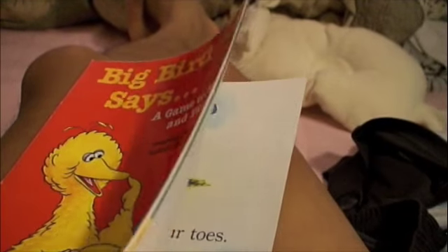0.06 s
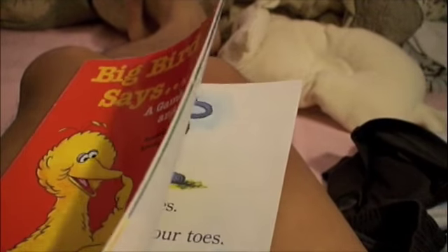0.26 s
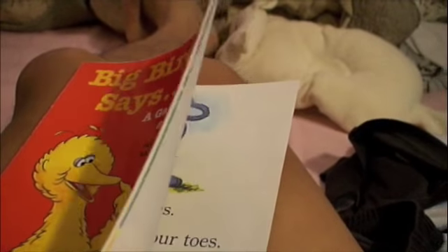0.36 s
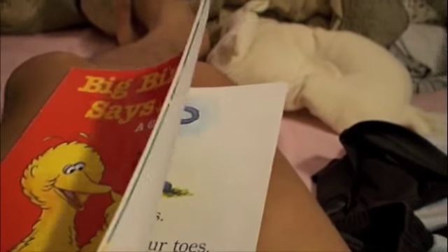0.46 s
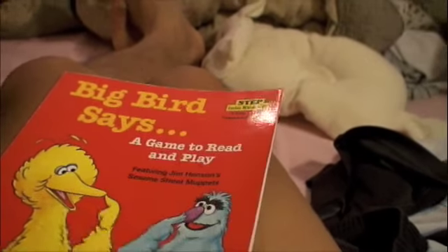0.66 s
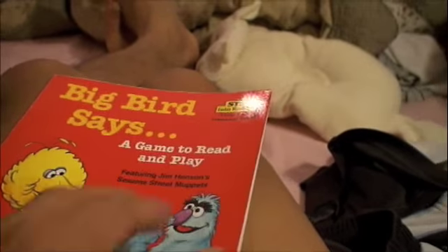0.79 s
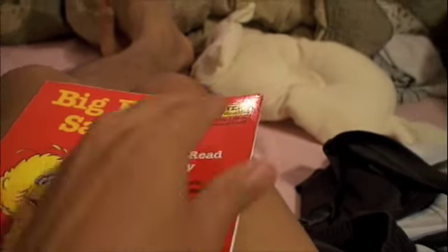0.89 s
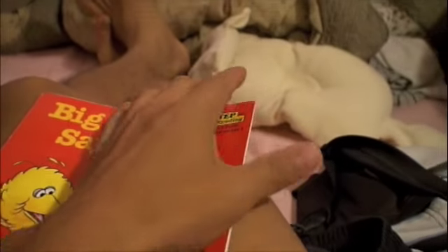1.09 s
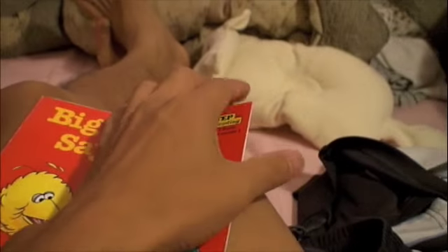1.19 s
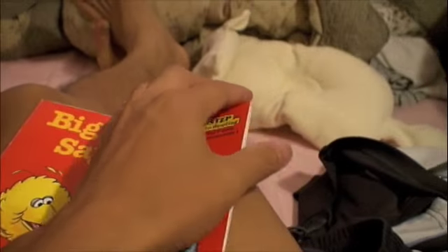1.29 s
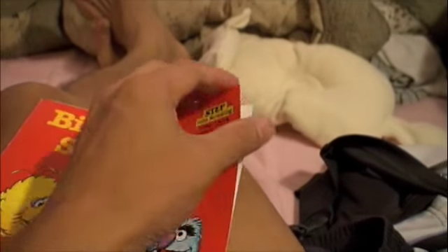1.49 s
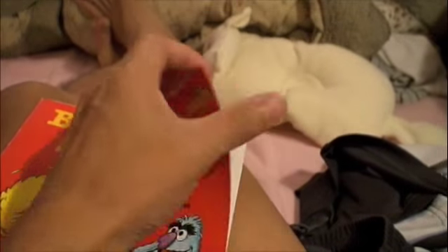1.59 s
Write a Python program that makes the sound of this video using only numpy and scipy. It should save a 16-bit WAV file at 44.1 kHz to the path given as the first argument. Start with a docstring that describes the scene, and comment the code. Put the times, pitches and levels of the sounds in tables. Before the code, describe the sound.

A thin book flicks and slaps shut close by in a quiet room.

```python
"""A thin, stiff picture book is closed near the microphone, over the low hum of a quiet bedroom.
The bent cover slides off the thumb and springs free with a sharp flick (0.22 s).
It swishes down and slaps shut, ringing the book (0.58 s); the pages settle in two dull pats.
A hand then brushes the cover and takes hold of its edge (1.3-1.5 s). The small room echoes briefly."""
import sys
import numpy as np
from scipy import signal
from scipy.fft import rfft, irfft, next_fast_len
from scipy.io import wavfile

SR = 44100
rng = np.random.default_rng(int(sys.argv[2]) if len(sys.argv) > 2 else 0)


def pcm_store(signal):
    """Save signal as 16-bit PCM."""
    levels = np.round(np.clip(np.atleast_2d(signal), -1, 1) * 32767)
    wavfile.write(sys.argv[1], SR, levels.astype(np.int16).T)


N = 72765

# room air spectrum, each side (frequency [Hz], gain [dB])
AIR_LEFT_EQ = [(25, -13), (85, 20.5), (200, 10.5), (400, 9), (1000, 3), (2000, -3.5), (5000, -13.5),
               (11000, -16.5), (16000, -45)]
AIR_RIGHT_EQ = [(25, 4.5), (85, 9.5), (200, 2), (400, 0), (1000, -3), (2000, -8), (5000, -11), (11000, -12),
                (16000, -13)]
# room hum (frequency [Hz], level [dB])
HUM_TONES = [(84, -63.5), (120, -64), (240, -67)]
# wall echo spectrum (frequency [Hz], gain [dB])
WALL_EQ = [(60, -6), (280, -2.5), (600, -7.5), (1200, -1), (1850, -0.5), (2500, 3), (3400, -2), (7000, 1),
           (9000, 4), (15000, 6.5)]
# left channel: thin bass, treble rolling off above 11 kHz (frequency [Hz], gain [dB])
LEFT_CHANNEL_EQ = [(30, -11), (80, -25.5), (200, -11.5), (500, -5.5), (1000, -1.5), (2500, -0.5),
                   (6000, 2.5), (10000, 3), (11200, 1), (11800, -2), (16000, -11)]

# skin on the glossy cover (peak time [s], level [dB], rise [s], fall [s])
BRUSH_STROKES = [(.345, -46, 0.032, 0.022), (.5775, -33.5, 0.0066, 0.0092), (.89, -59, 0.059, 0.038),
                 (1.265, -60, 0.018, 0.02), (1.35, -52, 0.023, 0.041), (1.43, -59, 0.036, 0.058),
                 (1.497, -44.5, .012, 0.014), (1.648, -56.5, 0.03, .03)]
# skin friction spectrum (frequency [Hz], gain [dB])
BRUSH_EQ = [(60, -11), (300, -2), (480, -2.5), (660, 8), (1500, 2), (2600, 0.5), (4000, -3.5), (8000, -4.5),
            (12000, 1), (16000, -12.5)]
# fingers landing (time [s], level [dB], tilt [dB/octave])
FINGER_TAPS = [(1.26, -49.5, -9), (1.4955, -40, -1.5)]
# cover under a finger (frequency [Hz], level [dB], t60 [s])
TAP_MODES = [(665, 3, 0.036), (710, -4, 0.021), (1106, -3.5, 0.088), (3800, -15, 0.011)]

# paper on paper or thumb (peak time [s], level [dB], rise [s], fall [s])
SLIDE_STROKES = [(0.0, -46, .02, 0.031), (.13, -44.5, 0.16, 0.14), (.21, -46.5, 0.11, 0.083),
                 (.578, -30, 0.004, 0.0051), (.595, -39.5, 0.0041, 0.037), (1.32, -55, 0.045, .035)]
# paper friction spectrum (frequency [Hz], gain [dB])
SLIDE_EQ = [(60, -3), (300, -6.5), (900, -5), (1900, -2), (3200, -8.5), (7000, -16), (11000, -17),
            (16000, -18.5)]
# cover swinging down (peak time [s], level [dB], rise [s], fall [s])
SWING_STROKES = [(.568, -47, 0.11, 0.0088)]
# swish spectrum (frequency [Hz], gain [dB])
SWING_EQ = [(100, -16), (700, -13.5), (2000, 2.5), (3200, -2), (5500, -5.5), (8000, -13), (16000, -14.5)]

# pages landing (time [s], ring [dB], click [dB], thump [dB], tilt [dB/octave], pan left [dB])
PAGE_DROPS = [(.6034, -21, -8, -27, 0, -1), (.6138, -22, -34, -26, -2, -5)]
# page stack (frequency [Hz], level [dB], t60 [s])
STACK_MODES = [(296, -13, 0.035), (425, -3.5, 0.035), (543, -4, 0.039), (716, -6, 0.053),
               (1270, -6.5, 0.022), (1750, -12, .01), (2610, -5.5, 0.01)]
# card-on-paper click spectrum (frequency [Hz], gain [dB])
CLICK_EQ = [(60, -23), (300, -2.5), (800, -7), (2300, -2), (3200, -6), (5000, -7.5), (6800, -8.5),
            (8800, -5.5), (15000, -24)]
# closed book (frequency [Hz], level [dB], t60 [s])
CLOSED_BOOK_MODES = [(440, -17, 0.013), (613, -14.5, 0.025), (810, -31.5, 0.014), (1140, -20.5, 0.0075),
                     (1615, -16, 0.0093), (2150, -17, 0.014), (2365, -12.5, 0.011), (4560, -18.5, 0.0054),
                     (5560, -15.5, 0.0032), (8750, -21, 0.0037)]
# flick crack spectrum (frequency [Hz], gain [dB])
CRACK_EQ = [(60, -37), (400, -16.5), (1000, 2), (2000, -2.5), (3200, -1.5), (4000, 4), (5800, -6.5),
            (7000, -6.5), (8100, -14.5), (10000, -7), (15000, -20)]
# bent cover (frequency [Hz], level [dB], t60 [s])
BENT_COVER_MODES = [(206, -35, 0.07), (586, -15, 0.02), (914, -6, 0.0082), (1040, -32, 0.0047),
                    (1743, 3.5, 0.01), (2103, 0, 0.0098), (2680, -12, 0.017), (2700, -39, 0.021),
                    (4030, -42, 0.0069), (4400, -43, 0.0064), (6370, -10.5, 0.0042), (10700, -44, 0.0051)]


def undb(db):
    """Decibels to gain."""
    return 10 ** (np.asarray(db) / 20)


def pan(left_db):
    """Stereo gains for a left-minus-right level."""
    return undb(np.array([[left_db], [-left_db]]) / 2)


def colour(x, eq):
    """Minimum-phase filter through (frequency [Hz], gain [dB]) points."""
    size = 2 * next_fast_len(N)
    hz, db = np.array(eq, float).T
    bins_hz = np.maximum(np.fft.rfftfreq(size, 1 / SR), 1)
    gain = undb(np.interp(np.log(bins_hz), np.log(np.sort(hz)), db))
    cepstrum = irfft(np.log(gain))
    cepstrum[1:size // 2] *= 2
    cepstrum[size // 2 + 1:] = 0
    return irfft(rfft(x, size) * np.exp(rfft(cepstrum)), size)[..., :N]


def since(start_s):
    """Seconds since the start, zero before it."""
    return np.maximum(np.arange(N) / SR - start_s, 0)


def fade(age_s, t60_s):
    """Exponential decay."""
    return np.exp(-np.log(1000) * age_s / t60_s)


def impulse(start_s, db):
    """One-sample push."""
    return undb(db) * (np.arange(N) == int(start_s * SR))


def burst(start_s, t60_s):
    """Decaying stereo noise."""
    age_s = since(start_s)
    return rng.standard_normal((2, N)) * (age_s > 0) * fade(age_s, t60_s)


def echo(x, delay_s, t60_s):
    """Diffuse stereo reflections of unit energy."""
    response = burst(delay_s, t60_s)
    response /= np.sqrt(np.sum(response ** 2, axis=1, keepdims=True))
    return signal.fftconvolve(x[None], response, axes=1)[:, :N]


def ring(start_s, modes, rise_cycles, lag_cycles, tilt_db_oct=0):
    """Modes of a card sheet; bending waves bring the high ones first."""
    out = np.zeros(N)
    for hz, db, t60_s in modes:
        age_s = since(start_s + lag_cycles / hz)
        gain = undb(db + tilt_db_oct * np.log2(hz / modes[1][0]))
        attack = 1 - np.exp(-age_s * hz / rise_cycles)
        out += gain * attack * fade(age_s, t60_s) * np.sin(2 * np.pi * hz * age_s)
    return out


def rub(strokes, eq, grain_db=1.5, grain_s=0.0011, spread=0.74):
    """Grainy friction noise, swelling and dying with each stroke."""
    t = since(0)
    power = sum(undb(2 * db) * np.exp(-2 * np.maximum((peak_s - t) / rise_s, (t - peak_s) / fall_s))
                for peak_s, db, rise_s, fall_s in strokes)
    noise = rng.standard_normal((4, N))
    sides, centre, roughness = noise[:2], noise[2], noise[3]
    grains = undb(grain_db * roughness[np.arange(N) // int(grain_s * SR)])
    hiss = colour((centre + spread * sides) * grains, eq)
    return hiss / hiss.std() * np.sqrt(power)


def contact(start_s, click_db, thump_db, thump_hz=205):
    """Two sheets meet: a click and a low puff of air."""
    age_s = since(start_s)
    thump = undb(thump_db) * fade(age_s, t60_s=0.0093) * np.sin(2 * np.pi * thump_hz * age_s)
    return thump + colour(impulse(start_s, click_db), CLICK_EQ)


def background(air_db=-46, shared_power=0.45):
    """Soft room air and a faint hum."""
    noise = rng.standard_normal((3, N))
    left, right = np.sqrt(1 - shared_power) * noise[:2] + np.sqrt(shared_power) * noise[2]
    air = np.array([colour(left, AIR_LEFT_EQ), colour(right, AIR_RIGHT_EQ)])
    hum = sum(undb(db) * np.sin(2 * np.pi * (hz * since(0) + rng.random())) for hz, db in HUM_TONES)
    return undb(air_db) * air + hum


def bedroom(x, scatter_db=-32, wall_db=-12):
    """Quick scatter from lap and bed, then the walls."""
    walls = colour(echo(x, delay_s=0.014, t60_s=0.26), WALL_EQ)
    scatter = echo(x, delay_s=0, t60_s=0.014)
    return undb(scatter_db) * scatter + undb(wall_db) * pan(left_db=-4) * walls


def hand():
    """Skin brushes the cover; fingers land and ring it softly."""
    taps = sum(undb(db) * ring(start_s, TAP_MODES, rise_cycles=1.1, lag_cycles=0, tilt_db_oct=tilt)
               for start_s, db, tilt in FINGER_TAPS)
    return taps + rub(BRUSH_STROKES, BRUSH_EQ)


def slide():
    """Paper rubs on paper or thumb."""
    return rub(SLIDE_STROKES, SLIDE_EQ)


def swing():
    """The cover swishes down."""
    return rub(SWING_STROKES, SWING_EQ)


def pages():
    """Loose pages drop onto the stack with dull pats."""
    out = np.zeros((2, N))
    for start_s, ring_db, click_db, thump_db, tilt, left_db in PAGE_DROPS:
        stack = ring(start_s, STACK_MODES, rise_cycles=0.5, lag_cycles=0.1, tilt_db_oct=tilt)
        out += pan(left_db) * (contact(start_s, click_db, thump_db) + undb(ring_db) * stack)
    return out


def slap(start_s=0.5791, ring_db=1.5):
    """The cover lands and rings the whole book."""
    body = ring(start_s, CLOSED_BOOK_MODES, rise_cycles=0.83, lag_cycles=1.91)
    return contact(start_s, click_db=-1.5, thump_db=-23) + undb(ring_db) * body


def flick(start_s=0.2217, crack_db=9.5, fibre_db=-14.5):
    """The bent cover springs free: a crack, a rasp of paper fibres, a very short ring."""
    fibres = undb(fibre_db) * burst(start_s, t60_s=0.015)
    crack = colour(impulse(start_s, crack_db) + fibres, CRACK_EQ)
    return crack + ring(start_s, BENT_COVER_MODES, rise_cycles=1.56, lag_cycles=0.35)


def scene():
    """Book and hand in the bedroom."""
    book = slide() + swing() + flick() + slap() + pages() + hand()
    return book + bedroom(book.mean(axis=0)) + background()


def record(dry, low_cut_hz=58, high_cut_hz=16000, peak_limit=2.2):
    """Unequal channels, low cut, soft clip, steep high cut."""
    low_cut = signal.butter(2, low_cut_hz, "high", fs=SR, output="sos")
    high_cut = signal.ellip(10, 0.2, 80, high_cut_hz, fs=SR, output="sos")
    channels = np.array([colour(dry[0], LEFT_CHANNEL_EQ), dry[1]])
    rounded = peak_limit * np.tanh(signal.sosfilt(low_cut, channels) / peak_limit)
    return signal.sosfilt(high_cut, rounded)


dry = scene()
out = record(dry)
pcm_store(out)
```